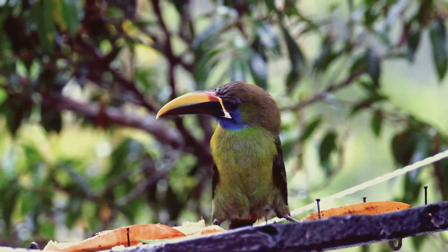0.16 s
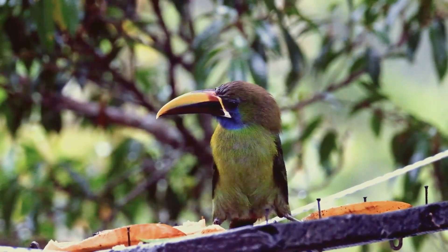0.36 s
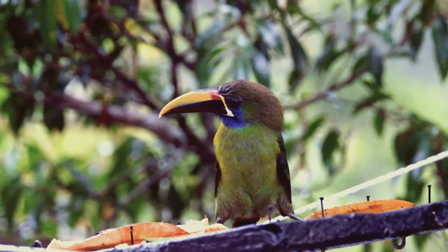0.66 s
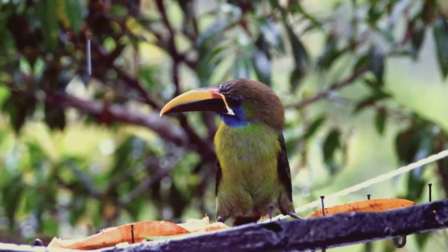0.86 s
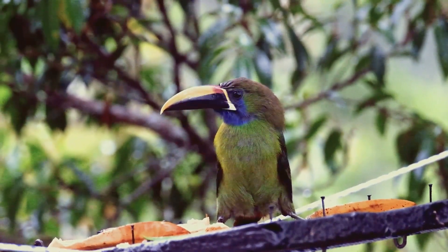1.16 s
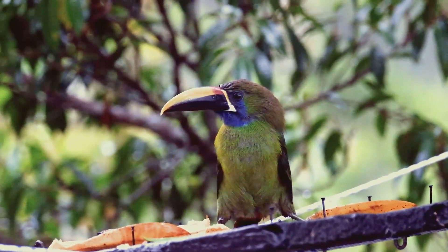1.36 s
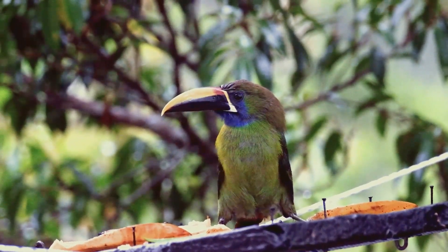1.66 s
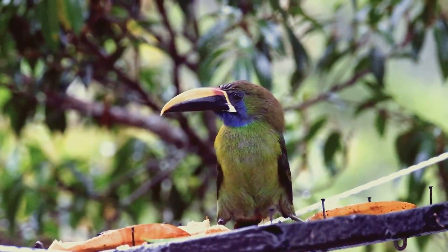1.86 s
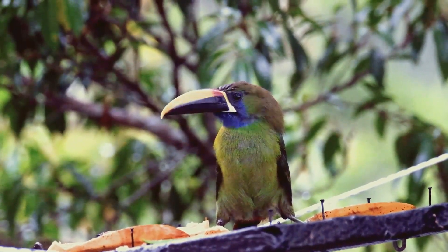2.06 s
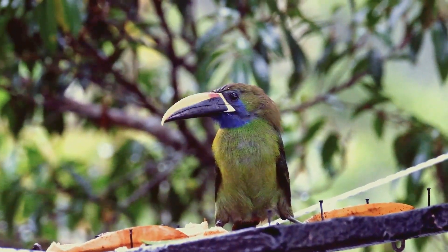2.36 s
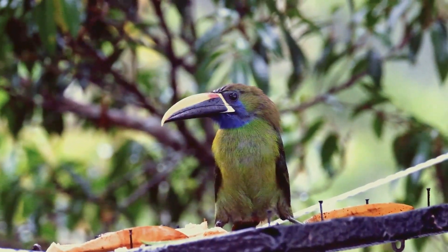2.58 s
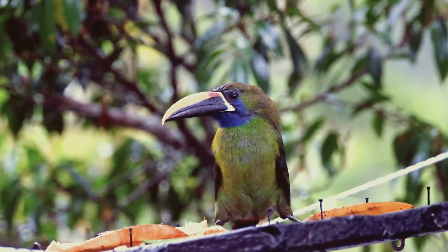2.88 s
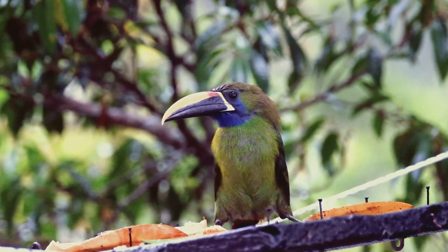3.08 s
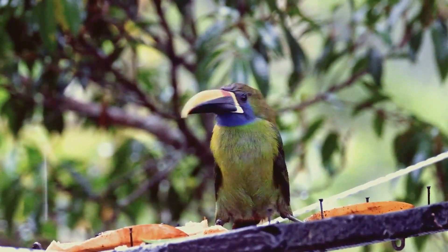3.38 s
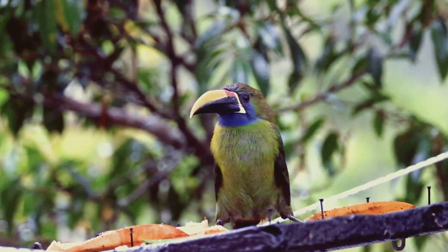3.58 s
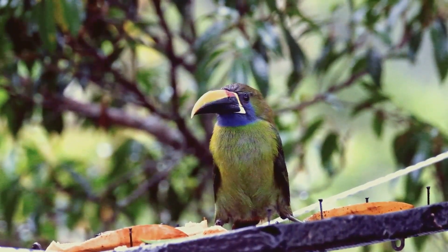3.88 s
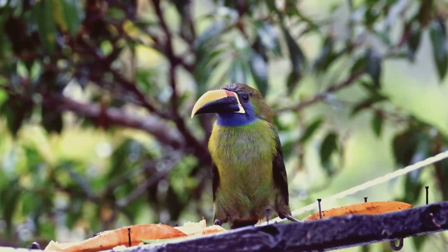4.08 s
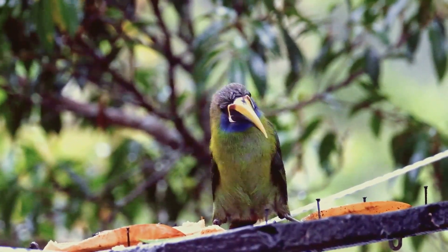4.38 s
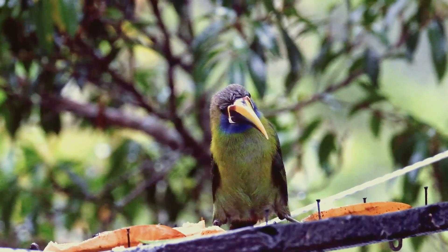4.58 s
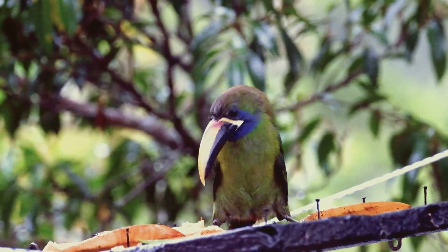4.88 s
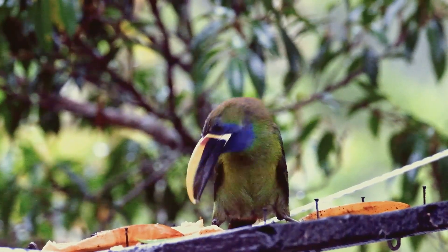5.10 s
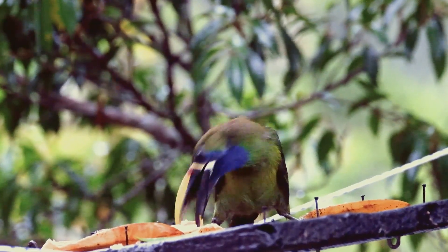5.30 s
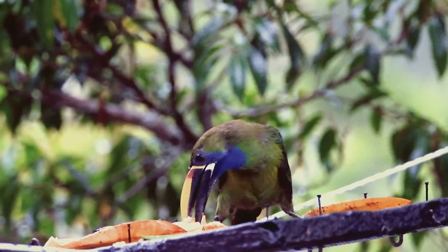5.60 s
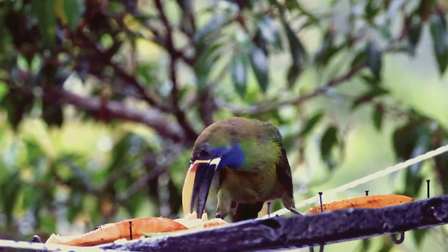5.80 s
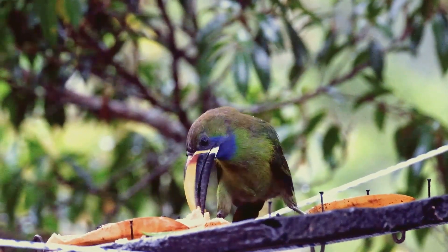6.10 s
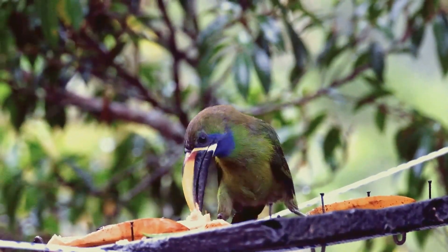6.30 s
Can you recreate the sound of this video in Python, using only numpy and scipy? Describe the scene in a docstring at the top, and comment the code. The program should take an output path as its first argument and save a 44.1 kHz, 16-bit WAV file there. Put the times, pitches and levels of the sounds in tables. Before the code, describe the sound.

Outdoor birdsong heard through a narrow stereo microphone pair: the opening is quiet, a soft whistle and softened first croaks fading in, then strong yelping, raspy croaks repeat evenly to the end. Hollow knocks sound near the microphone early on. A small bird's high sweeps speed up into a trill through the middle, a little left; thrush whistles return before and after. Faint thin calls, leaves, steady hiss and a low airy wash lie behind, with gentle tree echo.

```python
"""A toucanet croaks a steady series of short notes in a forest: a rising voiced yelp, built from partials,
that breaks into a rasp of uneven slaps sent through throat resonances. Around it a small bird trills fast
upward sweeps, with a second trill farther off; thrushes whistle near-sines, amid smeared hoarse notes and
thin high calls from far off. Knocks, ticks and buzzes of noise dot the scene; the trees return a soft echo
over a low wash of wind and water that fades in, leaves and steady hiss, heard by a narrow microphone pair."""
import sys
import numpy as np
from scipy import signal
from scipy.fft import rfft, irfft
from scipy.io import wavfile
from scipy.ndimage import uniform_filter1d

SR = 44100
rng = np.random.default_rng(int(sys.argv[2]) if len(sys.argv) > 2 else 0)


def digitize_waveform(pressure):
    """Quantize a signal to 16-bit integers and store it at the path in sys.argv[1].

    Rows of a 2-D input are taken as channels; values are limited to [-1, 1].
    """
    field = np.atleast_2d(pressure).T
    bounded = np.clip(field, -1, 1)
    quanta = np.round(bounded * 32767).astype(np.int16)
    wavfile.write(sys.argv[1], SR, quanta)


N = 284445


def gain_of(db):
    """Amplitude factor of a level in dB."""
    return 10 ** (np.asarray(db) / 20)


def evened(x):
    """Scale to an rms of 1."""
    return x / np.sqrt(np.mean(x ** 2) + 1e-20)


def read(points, hz):
    """Read a curve of (f/Hz, value) points along a logarithmic frequency axis."""
    f, value = np.transpose(points)
    return np.interp(np.log(hz + 1), np.log(f + 1), value)


def add(mix, s, sound):
    """Lay a sound into the mix at s seconds, cut off at either end."""
    at = round(s * SR)
    heard = sound[max(-at, 0):]
    part = mix[max(at, 0):][:len(heard)]
    part += heard[:len(part)]


def resonate(x, hz, width):
    """A resonance of gain 1, applied twice for steep skirts."""
    pole = np.exp((2j * np.pi * hz - np.pi * width) / SR)
    once = signal.lfilter([1 - abs(pole)], [1, -pole], x)
    return 2 * signal.lfilter([1 - abs(pole)], [1, -pole], once).real


def wander(count, span_s):
    """Smooth chance of rms 1: white noise averaged twice over a short span."""
    span = max(round(span_s * SR), 1)
    rough = rng.standard_normal(count + 2 * span)
    return evened(uniform_filter1d(uniform_filter1d(rough, span), span))[span:-span]


def noise(spectrum, patchy_db):
    """Two unrelated noises with one spectrum and shared drifting patches, together of rms 1."""
    frames, hz = N // 256 + 5, np.fft.rfftfreq(1024, 1 / SR)
    a, b, c, d, patches = rng.standard_normal((frames, 513, 5)).T
    patches = evened(uniform_filter1d(uniform_filter1d(patches, 10, 0), 14, 1))
    level_db = read(spectrum, hz)[:, None] + patchy_db * patches
    z = np.array([a + 1j * b, c + 1j * d]) * gain_of(level_db)
    return evened(signal.istft(z, nperseg=1024, noverlap=768)[1][:, :N])


# low wash of wind and water, spectrum: (f/Hz, relative level per Hz/dB)
WASH_SPECTRUM = [(12, -29), (20, 5), (48, -3), (243, -5.5), (327, 0), (635, -7.5), (797, -18), (917, -11.5),
                 (1300, -23), (1690, -31.5), (2860, -120)]
# how the scene fades in: (t/s, wash level/dB)
WASH_FADE_IN = [(0, -59), (.5, -58.5), (.8, -52), (1.6, -52), (2.9, -53.5), (5.5, -53), (6.45, -52.5)]
# leaves, spectrum: (f/Hz, relative level per Hz/dB)
LEAVES_SPECTRUM = [(600, -56), (900, -9.5), (1300, -3.5), (2200, -3), (4000, -11), (6000, -13.5),
                   (7800, -14), (8800, -30.5), (10000, -53)]
# steady hiss, spectrum: (f/Hz, relative level per Hz/dB)
HISS_SPECTRUM = [(1000, -48), (3000, -9.5), (8000, -3), (10000, -4), (15000, -6.5), (16500, -5)]
LEAVES_DB, HISS_DB = -60, -69.5


def background():
    """Shaped noise: a wash that fades in, then stays nearly level; patchy leaves fading in less; even hiss."""
    fade_in = gain_of(np.interp(np.arange(N) / SR, *np.transpose(WASH_FADE_IN)))
    wash = fade_in * noise(WASH_SPECTRUM, patchy_db=2.0)
    leaf_fade_in = (fade_in / fade_in.mean()) ** 0.53
    leaves = gain_of(LEAVES_DB) * leaf_fade_in * noise(LEAVES_SPECTRUM, patchy_db=5.5)
    hiss = gain_of(HISS_DB) * noise(HISS_SPECTRUM, patchy_db=0)
    return wash + leaves + hiss


# the thrush's motifs by name: (t/s from the start, f/Hz, level/dB), before the factors of the song
THRUSH_MOTIFS = { "stepped fall": [(0, 2560, -18), (.03, 2820, -5), (.05, 2870, -12), (.07, 2697, -0.8),
                 (.1, 2740, 0), (.113, 2780, -15), (.13, 2666, -0.1), (.18, 2340, -3.5), (.2, 2290, -18)],
                 "low arch": [(0, 2370, -2), (.01, 2400, -1.5), (.07, 2502, 0.2), (.12, 2420, -2),
                 (.137, 2360, -9.5)], "short fall": [(0, 2960, 0), (.012, 2850, .3), (.032, 2740, -4),
                 (.055, 2490, -2)], "upper voice": [(0, 3150, -9), (.03, 3150, -3.5), (.09, 3106, 1),
                 (.115, 3193, -6.5), (.17, 3130, -3.5), (.2, 3120, -12)],
                 "lower voice, rising": [(0, 2810, -12), (.01, 2822, -3), (.032, 2910, 1), (.05, 2840, -2),
                 (.13, 2864, 0), (.16, 3000, -7), (.23, 2974, 1.5), (.245, 3050, -20)],
                 "lower voice, arched": [(0, 2784, -5), (.08, 2955, -2), (.11, 2920, -0.5), (.13, 2805, -6),
                 (.184, 2776, -2), (.195, 2820, 0)], "high arch": [(0, 2470, -10.5), (.022, 2710, -2),
                 (.06, 2817, -1), (.105, 2685, 0.7), (.16, 2560, 0), (.172, 2500, -4)],
                 "faint slide": [(0, 3370, 7), (.04, 3290, -9), (.23, 3160, -7), (.27, 3020, 2)]}


def whistle(motif, db, pitch_factor, length_factor, waver, flutter_db):
    """A near sine with rounded glides, a slight waver of pitch and flutter of level."""
    s, hz, shape_db = np.transpose(THRUSH_MOTIFS[motif])
    t = np.arange(0, s[-1], 1 / SR / length_factor)
    glide = uniform_filter1d(np.interp(t, s, hz), size=500)
    pitch = pitch_factor * glide * (1 + waver * wander(len(t), 0.0024))
    level_db = db + np.interp(t, s, shape_db) + flutter_db * wander(len(t), .0046)
    level = gain_of(level_db) * signal.windows.tukey(len(t), .17)
    return np.sqrt(2) * level * np.sin(2 * np.pi * np.cumsum(pitch) / SR)


# thrush song: (t/s, motif, level/dB, pitch factor, length factor)
THRUSH_SONG = [ (-.025, "stepped fall", -37.5, .995, 0.98), (0.679, "stepped fall", -37.5, 1.003, 1),
               (.79, "faint slide", -58, 1.04, 1), (2.518, "low arch", -37, 1.007, 0.96),
               (2.657, "short fall", -47.5, 0.99, 1.2), (2.825, "lower voice, rising", -46.5, 0.98, 0.97),
               (2.835, "upper voice", -46.5, 1.01, 1.19), (3.6, "low arch", -37, 0.99, 1.02),
               (3.742, "short fall", -46.5, .98, 1.05), (3.879, "lower voice, arched", -45.5, 0.97, 1.04),
               (3.88, "upper voice", -44, 0.98, 0.99), (5.625, "high arch", -34, 1.006, 0.96),
               (6.17, "high arch", -32.5, .99, .96)]


def thrush_song():
    """Motifs whistled in turn, sometimes two voices at once."""
    thrush = np.zeros(N)
    for s, *row in THRUSH_SONG:
        add(thrush, s, whistle(*row, waver=.0015, flutter_db=1.2))
    return thrush


# how long the trees ring: (f/Hz, time to fall by 60 dB/s)
FOREST_T60 = [(500, 0.29), (1800, 0.9), (3000, 0.81), (5500, 0.75), (9000, 0.74)]


def forest(x):
    """Sparse echoes off trunks, each band dying at its own speed; one tail for the middle, one for the side."""
    taps = np.zeros((2, SR))
    at = np.arange(240, SR - 20, 20) + rng.integers(0, 20, (2, (SR - 241) // 20))
    np.put_along_axis(taps, at, rng.choice([-1., 1.], at.shape), 1)
    hz, t, z = signal.stft(taps, SR, nperseg=256)
    early = 1 + 1.58 * np.exp(-t / 0.028)  # the nearest branches answer strongest
    decay = gain_of(-60 * t / read(FOREST_T60, hz)[:, None])
    tail = signal.istft(z * early * decay, SR, nperseg=256)[1]
    return signal.fftconvolve(x[None], tail / np.linalg.norm(tail[0]), axes=1)[:, :N]


def blurred(s, end, first_hz, last_hz, db, blur_hz):
    """A glide whose tone is smeared by chance over a narrow band."""
    count = round((end - s) * SR)
    tone = np.exp(2j * np.pi * np.cumsum(np.linspace(first_hz, last_hz, count)) / SR)
    smear = 1.27 + wander(count, 0.34 / blur_hz) + 1j * wander(count, 0.41 / blur_hz)
    return gain_of(db) * evened((tone * smear).real) * signal.windows.tukey(count, .7)


FAINT_NOTES, FAINT_LOW_HZ, FAINT_HIGH_HZ = 22, 4210, 8800
FAINT_DB, FAINT_SPREAD_DB = -73.5, 5.5  # the spread raises each note by a random part of it
FAINT_S, FAINT_BLUR_HZ = .14, 90  # mean length, blur


def faint_notes():
    """Rows for short, slightly falling notes deep in the forest, at random times and pitches."""
    when, pitch, length, level = rng.random((FAINT_NOTES, 4)).T
    starts = when * N / SR
    pitches = FAINT_LOW_HZ + (FAINT_HIGH_HZ - FAINT_LOW_HZ) * pitch
    ends = starts + FAINT_S * (.5 + length)
    levels = FAINT_DB + FAINT_SPREAD_DB * level
    return [(s, end, hz, .98 * hz, db, FAINT_BLUR_HZ)
            for s, end, hz, db in zip(starts, ends, pitches, levels)]


# distant or hoarse notes: (t/s, end t/s, first f/Hz, last f/Hz, level before fades/dB, blur/Hz)
BLURRED_NOTES = [ (.173, 0.5, 7134, 6950, -61.5, 110), (0.256, .42, 8200, 7950, -68, 100),
                 (.326, .497, 4750, 4600, -71, 75), (.374, .5, 6500, 6460, -64, 230),
                 (0.381, 0.605, 7730, 7690, -65.5, 100), (0.599, 0.799, 9360, 9300, -68, 330),
                 (0.701, 1.053, 7490, 7300, -61, 185), (1.36, 1.6, 6600, 6730, -69.5, 75),
                 (1.458, 1.497, 2890, 2860, -52, 160), (1.535, 1.896, 7310, 7010, -54, 111),
                 (1.656, 1.691, 2780, 3060, -52, 150), (1.688, 1.779, 8200, 8250, -63, 320),
                 (1.694, 1.74, 2880, 2450, -45, 200), (1.77, 1.804, 2620, 2680, -61, 150),
                 (1.775, 1.805, 3500, 3380, -51, 60), (1.808, 1.875, 3330, 3670, -52.5, 50),
                 (1.822, 1.923, 2350, 3080, -51, 50), (1.858, 1.906, 4000, 3900, -61, 120),
                 (1.892, 2.112, 4700, 4980, -63.5, 280), (1.893, 2.052, 3360, 3860, -61, 180),
                 (1.915, 2.035, 7580, 7500, -59, 150), (1.924, 2.264, 8190, 8080, -60.5, 120),
                 (1.946, 2.05, 3980, 4110, -61, 110), (2.058, 2.358, 7450, 7160, -54.5, 160),
                 (2.481, 2.525, 2670, 2990, -47, 185), (2.504, 2.588, 7180, 7800, -61.5, 160),
                 (2.856, 3.164, 7400, 7200, -60, 150), (3.559, 3.608, 2630, 2790, -51.5, 230),
                 (3.72, 3.797, 7950, 8100, -61, 160), (3.895, 4.125, 8000, 7700, -64.5, 110),
                 (4.079, 4.141, 2970, 2847, -47.5, 215), (4.392, 4.46, 2960, 2940, -63, 65.5),
                 (4.557, 4.618, 2970, 2920, -66, 59.7), (4.927, 4.972, 5060, 5020, -63, 300),
                 (5.017, 5.077, 3800, 3780, -67, 80), (5.17, 5.26, 3230, 3020, -61, 128),
                 (5.636, 5.84, 7870, 7800, -67, 110), (5.684, 5.72, 6770, 6900, -58, 100),
                 (5.754, 6.02, 4650, 4650, -60, 45.3), (5.867, 6.097, 8040, 7260, -57.5, 185),
                 (5.948, 5.99, 3591, 3290, -40, 150), (5.977, 6.04, 3348, 2995, -41.5, 444),
                 (6.061, 6.5, 7300, 7400, -63.5, 150), (6.211, 6.527, 4335, 4030, -55, 75)]


def hoarse_and_distant_notes():
    """Blurred glides: hoarse whistled notes and thin distant calls, with fainter ones deeper in the forest."""
    smeared = np.zeros(N)
    for row in BLURRED_NOTES + faint_notes():
        add(smeared, row[0], blurred(*row))
    return smeared


# throat and bill resonances: (f/Hz, width of each of two passes/Hz, level/dB)
THROAT_RESONANCES = [(406, 107, -8.5), (877, 425, -7), (1748, 316, 7), (2370, 170, -22), (3252, 155, -27.5),
                     (4115, 330, -24), (5090, 390, -27), (6590, 1700, -29.5), (7780, 280, -28.5),
                     (11900, 5700, -57)]
# how the throat passes the partials of the sung part: (f/Hz, level/dB)
SUNG_RESPONSE = [(450, -25.5), (700, -18), (1000, -13.5), (1250, -10.5), (1500, -4), (1800, 1),
                 (2050, -8.5), (2300, -23), (2900, -38.5), (4000, -28), (6000, -69.5)]
START_HZ, RISE_BEND = 495, 1.3  # every croak rises from here; the pitch climbs slowly at first
# relative to the croak's level: rasp, breath of a clear croak, and what full hoarseness adds to the breath
RASP_DB, BREATH_DB, HOARSE_BREATH_DB = 10, 9.5, 10


def croak(croak_db, top_hz, rise, voiced, rasp, hoarse):
    """The membranes swing faster up to a top pitch, sag a little, then lose their beat and slap unevenly;
    all passes the throat."""
    t = np.arange(round(.16 * SR)) / SR
    count, climb = len(t), np.clip(t / rise, 0, 1)
    air, jitter, chance = rng.standard_normal(count), wander(count, 0.0022), rng.random(count)
    arch = np.sin(np.pi / 2 * np.minimum(t / rise, 1)) ** RISE_BEND - 14.8 * np.maximum(t - rise, 0)
    hz = (START_HZ + (top_hz - START_HZ) * arch) * (1 + .005 * jitter)
    turns = np.cumsum(hz) / SR
    share = hoarse * climb ** 2  # strong and weak beats alternate near the top
    swing = np.zeros(count)
    for k in range(1, 13):  # partials of half the pitch; the odd ones carry the alternation
        level = (share if k % 2 else 1) * gain_of(read(SUNG_RESPONSE, abs(hz) * k / 2))
        swing += level * np.cos(np.pi * (k * turns + k * k / 8))
    # a soft start, then full breath
    pressure = np.clip(t / 0.0038, 0, 1) * gain_of(-9 * np.clip((.024 - t) / 0.0099, 0, 1))
    sung = np.clip((voiced - t) / .004, 0, 1)
    # the swing falters before it breaks
    unsteady = 1 + (0.37 + 0.35 * hoarse) * climb ** 3.0 * np.tanh(wander(count, 0.0019))
    beat_hz = 210 * np.clip(1 + .8 * wander(count, .003), .1, 3)
    beats = np.diff(np.floor(np.cumsum(beat_hz) / SR), prepend=0)
    slaps = evened(beats * gain_of(3.1 * chance)) + .5 * air
    breaking = np.clip(1 + (t - voiced) / (0.0076 + 0.021 * hoarse), 0, 1)  # hoarse croaks break up earlier
    fading = gain_of(-7 * np.maximum(t - voiced, 0) / rasp)
    dying = breaking * fading * np.clip((voiced + rasp - t) / 0.024, 0, 1)
    breath_db = BREATH_DB + HOARSE_BREATH_DB * hoarse
    breath = gain_of(breath_db) * air * np.exp(-((t - 0.94 * voiced) / 0.024) ** 2 / 2)
    rattle = gain_of(RASP_DB) * uniform_filter1d(dying * slaps, size=4)  # soft tissue rounds each slap
    # breath noise forms in the bill, past the low resonances
    passed = sum(gain_of(db) * resonate(rattle + breath * (f > 3000), f, width)
                 for f, width, db in THROAT_RESONANCES)
    return gain_of(croak_db) * (np.sqrt(2) * pressure * sung * unsteady * swing + passed)


# croaks: (t/s, level/dB, the first ones softened by the fade-in, top f/Hz, rise/s, voiced/s, rasp/s,
# hoarseness 0-1)
CROAK_SERIES = [ (.205, -43, 874, 0.045, .062, 0.059, 0.24), (.706, -36.5, 919, 0.051, .065, 0.031, 0.15),
                (1.06, -25.5, 1005, 0.046, .054, 0.037, 0.21), (1.659, -26, 906, 0.043, 0.056, 0.037, 0.26),
                (2.194, -26, 954.5, .046, .062, .047, 0.17), (2.684, -26.5, 952, .05, 0.064, 0.041, 0.84),
                (3.179, -26, 986, 0.05, 0.065, 0.047, 0.37), (3.679, -26.5, 998, .055, 0.07, 0.034, 0.51),
                (4.153, -25, 1006, .048, .062, 0.048, 0.16),
                (4.616, -26.5, 950.4, 0.046, 0.062, 0.048, 0.84),
                (5.085, -27.5, 901, .036, 0.061, 0.061, 1), (5.56, -24, 1002, 0.052, 0.064, 0.05, 0.28),
                (6.036, -26, 964, 0.051, 0.065, 0.052, 1)]


def toucanet_croaks():
    """The steady series of croaks, each with its own level, pitch and hoarseness."""
    toucanet = np.zeros(N)
    for s, *row in CROAK_SERIES:
        add(toucanet, s, croak(*row))
    return toucanet


# dull knocks close to the microphone: (t/s, level before onset and decay/dB, f/Hz)
NEAR_KNOCKS = [(1.198, -31, 277), (1.216, -40, 320), (1.235, -32, 309), (1.449, -24, 308),
               (1.479, -27, 295), (1.491, -31.5, 358), (2.236, -31.5, 281), (5.835, -33, 222),
               (6.151, -29.5, 222.4)]
# short high buzzes: (t/s, level before fades/dB, f/Hz, width of each of two passes/Hz, length/s)
HIGH_BUZZES = [(1.78, -58, 9700, 2500, 0.026), (1.808, -60.5, 9600, 2500, 0.088),
               (2.954, -67, 9500, 900, 0.1), (4.166, -69, 9500, 1500, 0.069),
               (4.364, -63, 8100, 1480, 0.034), (4.484, -55, 7560, 1770, 0.045),
               (5.94, -72, 9500, 900, .11)]
# dry twig ticks: (t/s, level before decay/dB)
TWIG_TICKS = [(3.4106, -48), (3.507, -44)]


def small_sounds():
    """Knocks ring as decaying sines; buzzes and ticks are noise through a resonance."""
    out, t = np.zeros(N), np.arange(2000) / SR
    for s, db, hz in NEAR_KNOCKS:  # a hollow ring with a weaker, shorter overtone
        ring = gain_of(db - 60 * t / 0.027) * np.clip(t / 0.0014, 0, 1)
        add(out, s, ring * np.sin(2 * np.pi * hz * t))
        overtone = gain_of(db - 13.5 - 60 * t / 0.017) * np.clip(t / .001, 0, 1)
        add(out, s, overtone * np.sin(2 * np.pi * 2.4 * hz * t))
    for s, db, hz, width, length in HIGH_BUZZES:
        count = round(length * SR)
        buzz = evened(resonate(rng.standard_normal(count), hz, width))
        add(out, s, gain_of(db) * buzz * signal.windows.tukey(count, .5))
    for s, db in TWIG_TICKS:
        tick = evened(resonate(rng.standard_normal(len(t)), 1800, 2500))
        add(out, s, gain_of(db - 60 * t / 0.0091) * tick)
    return out


TRILL_TOP_HZ = 8250  # no sweep is heard above this
SWEEP_LEAD_S = 25 / 1000  # from the start of a sweep's buffer to its middle


def sweep(db, hz, slope, half_ms, kick_hz):
    """One quick upward glide: a steep kick at the start, a straight run, a thin end."""
    ms = np.arange(-25 * SR // 1000, 25 * SR // 1000) * 1000 / SR
    since = ms + 2.6 * half_ms
    pitch = hz + slope * ms - kick_hz * np.exp(-np.maximum(since, 0) / 1.96)
    inside = np.clip(since / 2.5, 0, 1) * np.clip((TRILL_TOP_HZ - pitch) / 150, 0, 1)
    shape = inside * np.exp(-np.abs(ms / (np.where(ms < 0, 2.3, 1.3) * half_ms)) ** 1.62)
    shape = shape + inside * 0.073 * (ms > 0) * np.exp(-(ms / (3.5 * half_ms)) ** 4)  # the thin end
    flutter = gain_of(2.53 * wander(len(ms), 0.0024))
    return gain_of(db) * shape * flutter * np.sin(2 * np.pi * np.cumsum(pitch) / SR)


FAR_START_S, FAR_GAP_S, FAR_SWEEPS = 1.296, .062, 10
FAR_PEAK_S, FAR_PEAK_DB, FAR_FADE_DB_PER_S2 = 1.63, -50.5, 60
FAR_HZ, FAR_SINK_HZ_PER_S, FAR_SLOPE_HZ_PER_MS, FAR_HALF_MS = 4750, 605, 70, 5.4


def far_trill_sweeps():
    """A second trill farther off, even in pace and sinking: it swells and fades."""
    far_trill = np.zeros(N)
    for k in range(FAR_SWEEPS):
        s = FAR_START_S + k * FAR_GAP_S
        db = FAR_PEAK_DB - FAR_FADE_DB_PER_S2 * (s - FAR_PEAK_S) ** 2
        hz = FAR_HZ - FAR_SINK_HZ_PER_S * k * FAR_GAP_S
        add(far_trill, s - SWEEP_LEAD_S, sweep(db, hz, FAR_SLOPE_HZ_PER_MS, FAR_HALF_MS, kick_hz=60))
    return far_trill


# sweeps of the near trill: (t/s at the middle, level/dB)
NEAR_SWEEPS = [ (2.335, -42.5), (2.4588, -46.5), (2.581, -44), (2.703, -39.5), (2.826, -42), (2.9428, -37),
               (3.0394, -37), (3.112, -36.5), (3.18, -36.5), (3.244, -35.5), (3.315, -34), (3.384, -32.5),
               (3.451, -32), (3.518, -33), (3.5864, -32), (3.6525, -33), (3.717, -35), (3.7872, -32),
               (3.8552, -33.5), (3.9222, -33), (3.9899, -33), (4.0566, -31), (4.1278, -31.5),
               (4.1962, -32.5), (4.262, -29.5), (4.3327, -29), (4.4044, -32.5), (4.4714, -31.5),
               (4.5448, -30.5)]
# how they change as the trill goes on: (t/s, middle f/Hz, slope/Hz per ms, length scale/ms)
NEAR_TRILL_COURSE = [(2.33, 7480, 190, 2.4), (2.94, 6800, 167, 5), (3.039, 5740, 159.6, 3.24),
                     (3.45, 5660, 132.6, 5.18), (4.05, 5237, 116.5, 5.8), (4.55, 5360, 111.8, 5.4)]


def near_trill_sweeps():
    """Fast upward sweeps near by that grow lower, flatter and longer overall."""
    trill = np.zeros(N)
    when, *course = np.transpose(NEAR_TRILL_COURSE)
    for s, db in NEAR_SWEEPS:
        hz, slope, half_ms = (np.interp(s, when, values) for values in course)
        add(trill, s - SWEEP_LEAD_S, sweep(db, hz, slope, half_ms, kick_hz=466))
    return trill


# filter on the side signal of the narrow microphone pair: (f/Hz, level/dB)
SIDE_RESPONSE = [(30, -53), (60, -46), (170, -37), (350, -34), (700, -16), (1200, -15), (1800, -57.5),
                 (2300, -16), (4400, -24), (9000, -17.5), (15000, -27)]


def scene():
    """Mix the birds, their forest echo and the background to left and right."""
    thrush, smeared, toucanet = thrush_song(), hoarse_and_distant_notes(), toucanet_croaks()
    small, far_trill, trill = small_sounds(), far_trill_sweeps(), near_trill_sweeps()
    # each source sends its own share into the trees
    wet = gain_of(-8.5) * toucanet + gain_of(-0.5) * trill + gain_of(-5.5) * thrush + gain_of(-2) * small
    echo = forest(wet + gain_of(3.0) * far_trill + gain_of(-4.5) * smeared)
    mid, side = echo + background()
    mid = mid + toucanet + trill + thrush + far_trill + smeared + small
    side = side + 0.5 * thrush + 0.96 * trill  # these two sit a little to the left
    side = irfft(rfft(side) * gain_of(read(SIDE_RESPONSE, np.fft.rfftfreq(N, 1 / SR))), N)
    return np.array([mid + side, mid - side])


EDGE_HZ = 15780


def record(dry):
    """The band limit of the recorder: a steep low-pass."""
    low_pass = signal.firwin(1023, EDGE_HZ, window=("kaiser", 9), fs=SR)
    return signal.oaconvolve(dry, low_pass[None], "same")


dry = scene()
out = record(dry)
digitize_waveform(out)
```